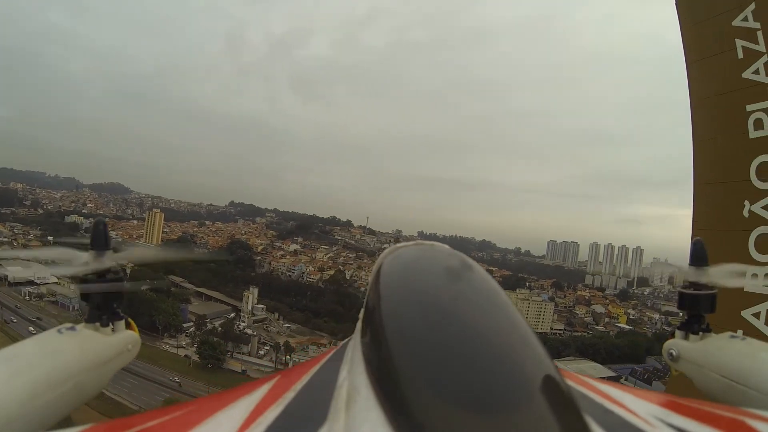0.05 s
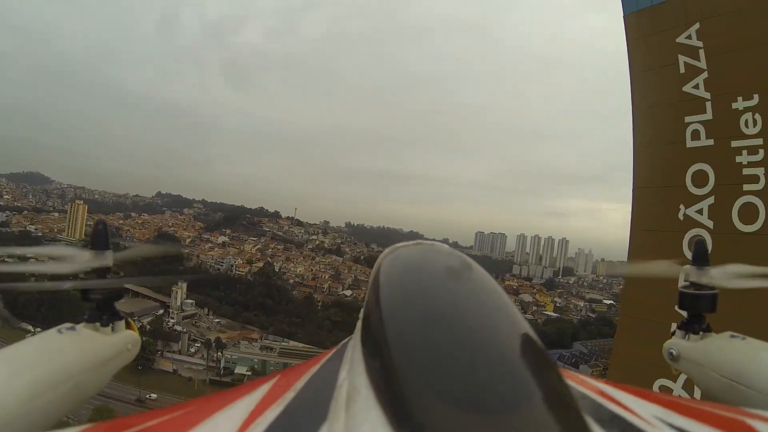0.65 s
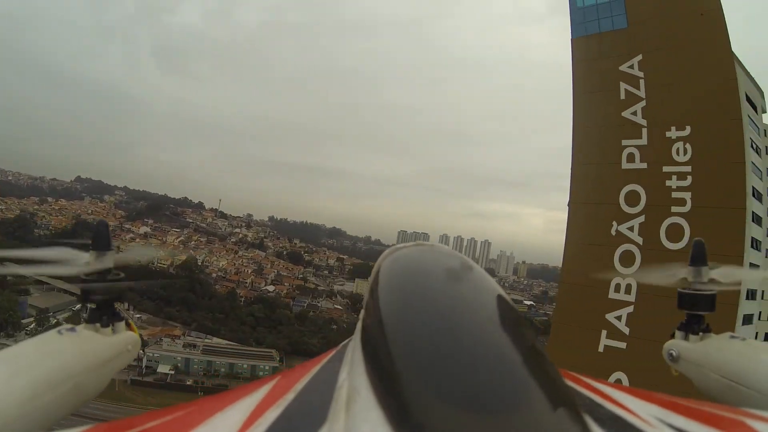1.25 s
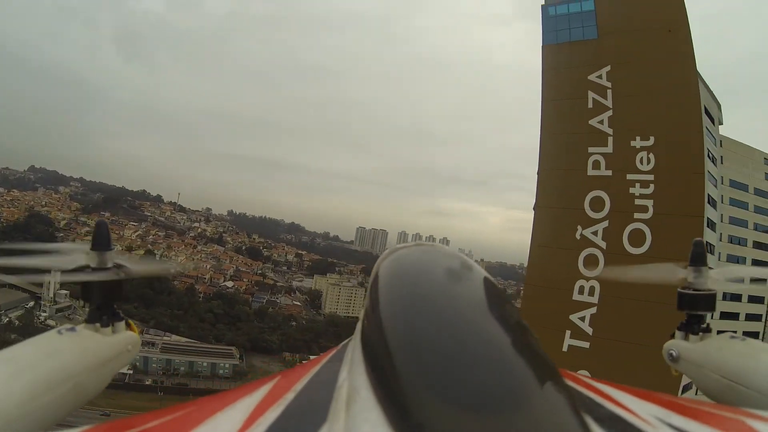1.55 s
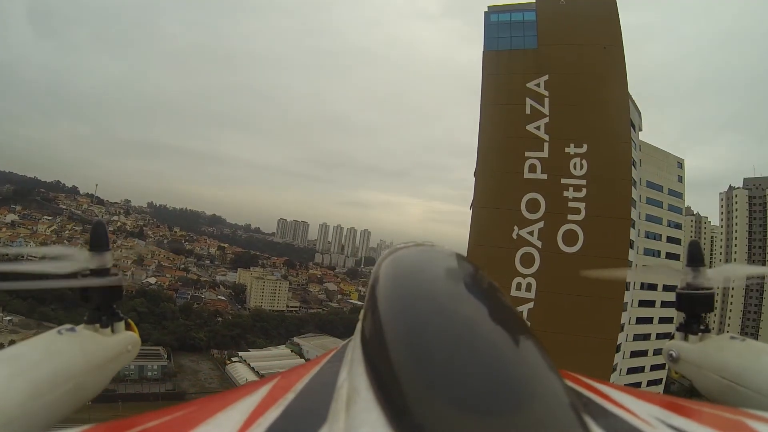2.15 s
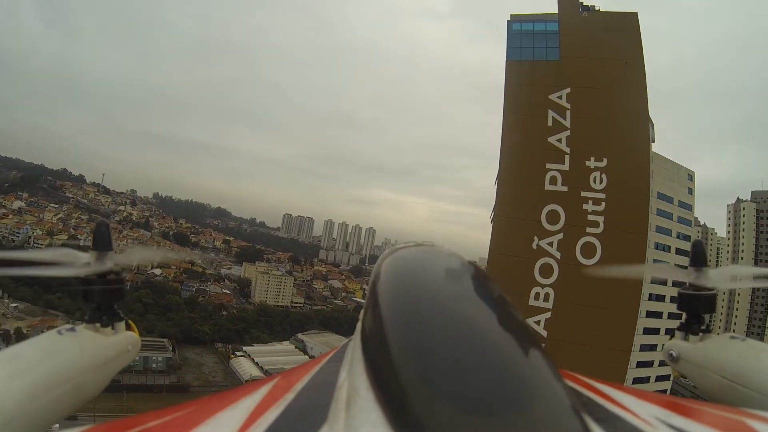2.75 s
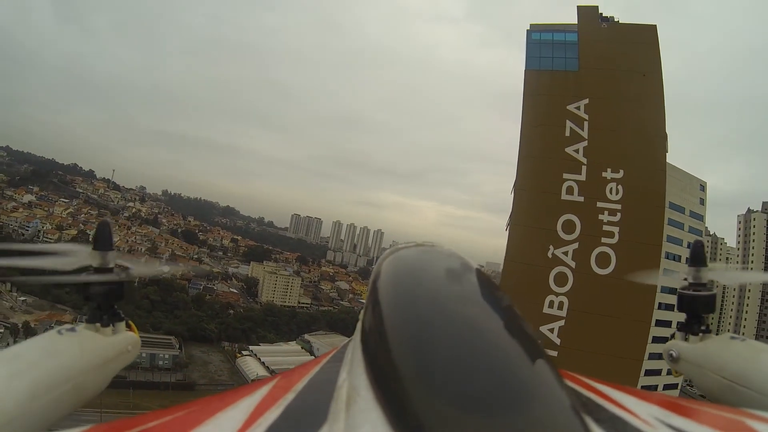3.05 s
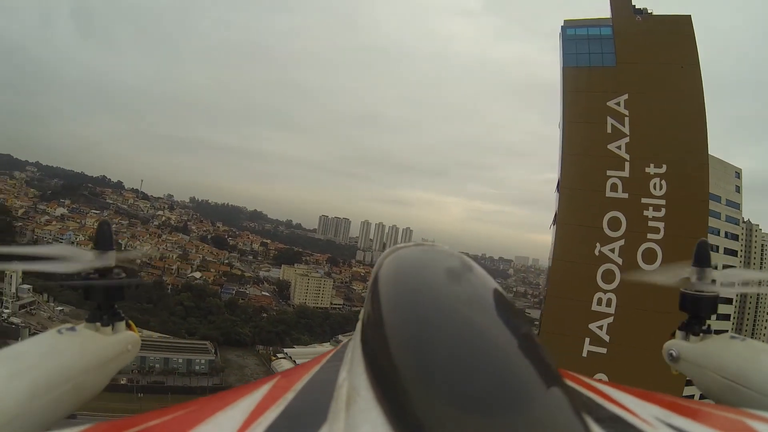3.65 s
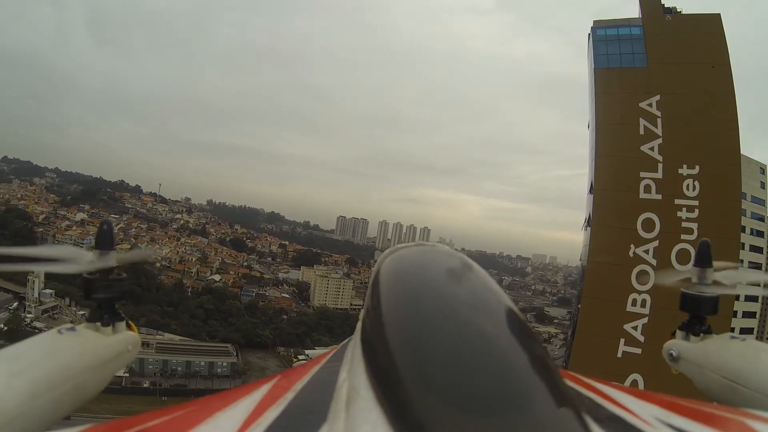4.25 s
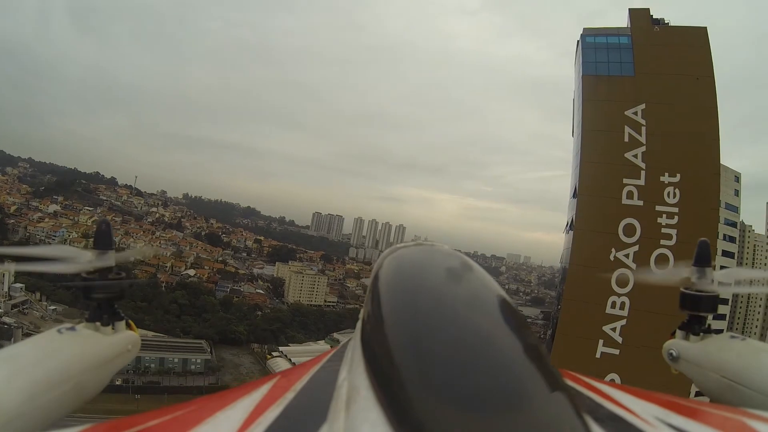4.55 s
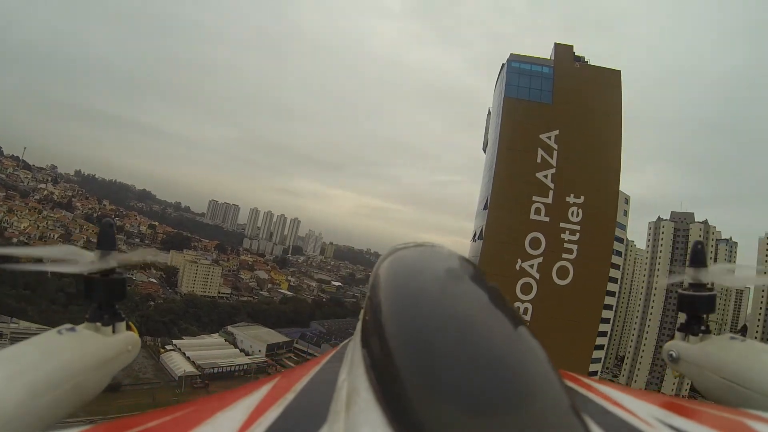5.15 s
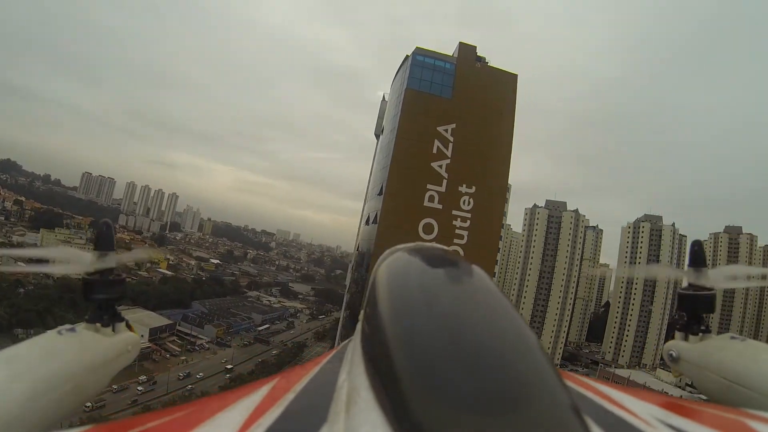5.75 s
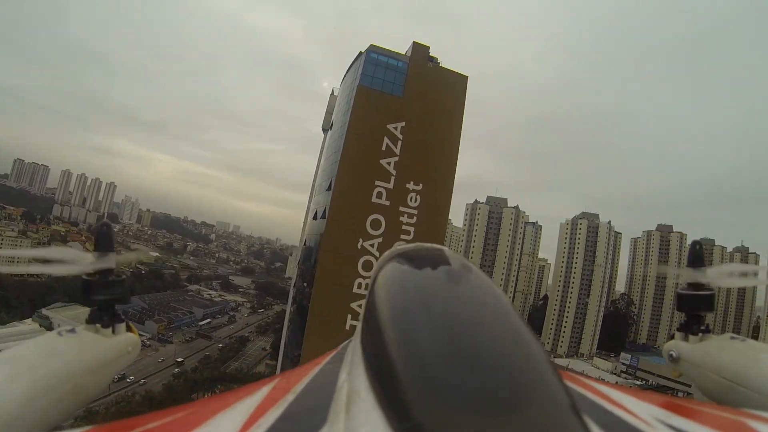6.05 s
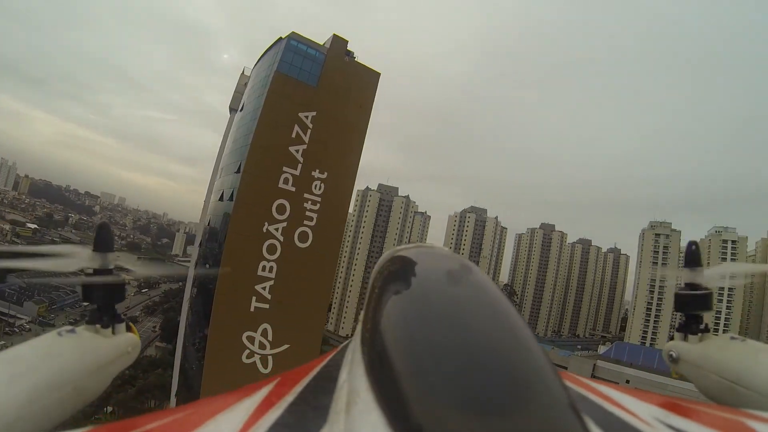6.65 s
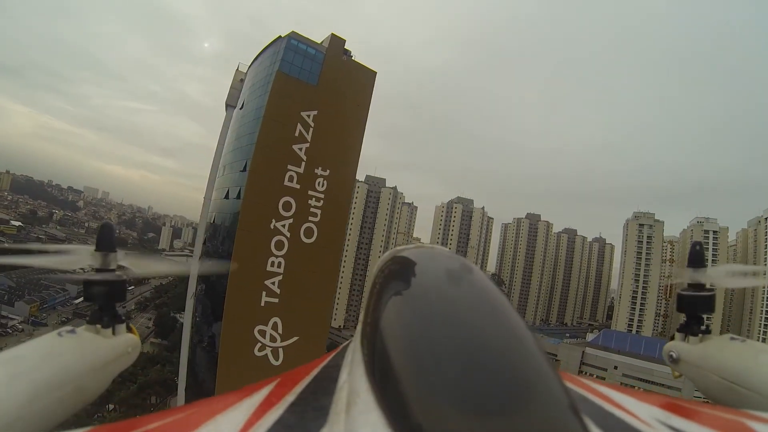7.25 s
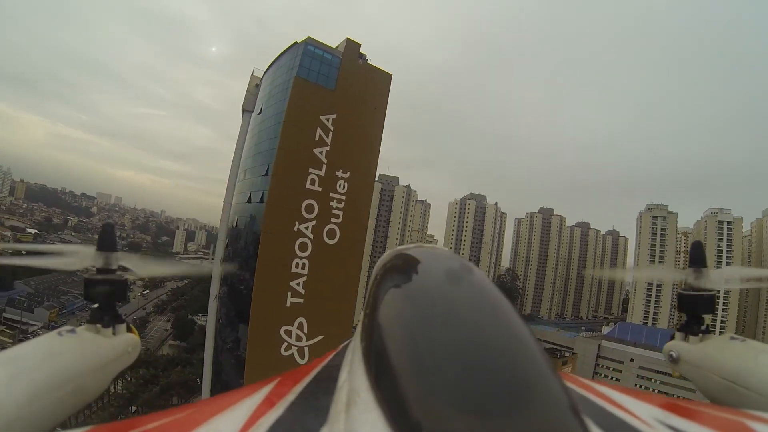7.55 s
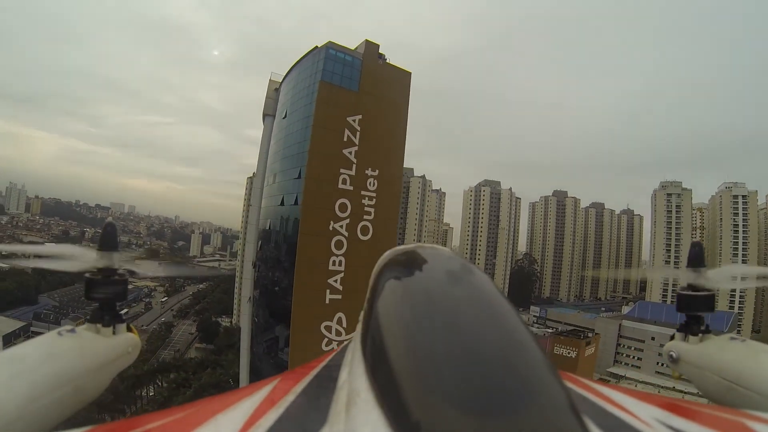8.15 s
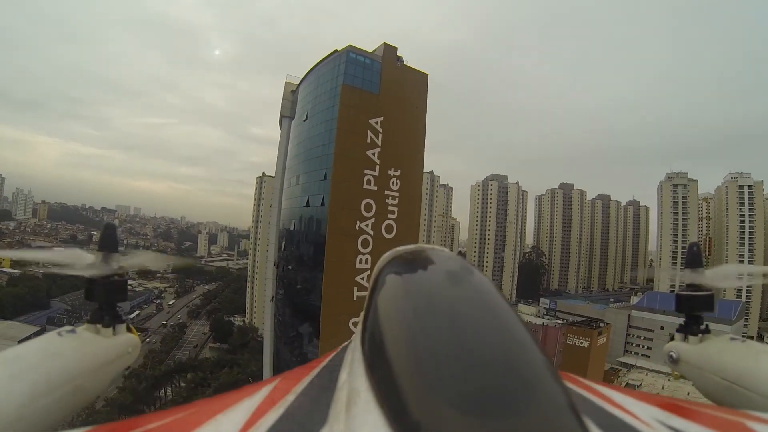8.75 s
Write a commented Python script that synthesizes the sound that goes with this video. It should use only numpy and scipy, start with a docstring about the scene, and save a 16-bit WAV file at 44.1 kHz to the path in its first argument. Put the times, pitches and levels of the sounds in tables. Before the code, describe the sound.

A small drone is in flight outdoors, heard very close from a microphone mounted on it. For the whole nine seconds or so, the nearest electric propeller holds a loud, steady, mid-pitched whine rich in overtones. Two quieter propellers waver just below it, creating a pulsing beat. Blade hiss, faint thin motor whistles and a low, lumpy wind rumble lie underneath. The whine brightens slightly around 1, 3 and 5 seconds. A fine, high buzz from the shaking mount grows stronger from about 4.5 seconds. At about 5.7 seconds a gust rushes over the microphone with low buffeting, ending in a swell of rumble near 7.7 seconds. The treble dips for an instant several times in the first three seconds and again near 7 seconds. The whine continues to the end.

```python
"""Three-propeller model aircraft in flight

Heard from a camera riding on it, the nearest propeller holds a loud, steady whine of blade-passage
harmonics; the two wing propellers hunt just below it and beat against it. Turbulence makes the blades
hiss, the motors whistle thinly, and the shaking makes the camera mount buzz. Wind rumbles on the
microphone, a gust rushes over it, and now and then the treble drops out for an instant."""
import sys
import numpy as np
from scipy import signal
from scipy.fft import rfft, irfft, next_fast_len
from scipy.io import wavfile

SR = 44100
rng = np.random.default_rng(int(sys.argv[2]) if len(sys.argv) > 2 else 0)


def file_out(sig):
    """Save sig as 16-bit WAV at sys.argv[1]."""
    # one column per channel
    cols = np.atleast_2d(sig).T
    # limit, then scale
    lim = np.clip(cols, -1, 1)
    pcm = np.round(lim * 32767).astype(np.int16)
    wavfile.write(sys.argv[1], SR, pcm)


N = 392490
TIME = np.arange(N) / SR

# nearest propeller: (time [s], shaft speed [Hz], blade tone level [dB])
NEAR_PROPELLER = [(0, 258, -14), (.7, 255.9, -13.5), (1.2, 257.7, -13.5), (1.8, 257.1, -13),
                  (4.4, 256.8, -12.5), (5, 257.2, -13), (5.85, 257.2, -13), (6.1, 257, -12),
                  (6.7, 256.8, -12.5), (7.1, 256.6, -11), (7.4, 257.1, -14.5), (8.3, 256.8, -13),
                  (8.9, 256.5, -12.5)]
# gust: (time [s], relative buffeting level [dB], relative rush level [dB])
GUST_LEVELS = [(5.74, -34, -41), (5.9, -31, -26.5), (6.1, -40, -33.5), (6.6, -41, -32), (7, -41.5, -33),
               (7.45, -34, -30.5), (7.62, -33.5, -33), (7.7, -43, -45)]


def gain_of(db):
    """Amplitude grows tenfold for every 20 dB."""
    return np.exp(np.asarray(db) * (np.log(10) / 20))


def unit_rms(x):
    """Normalisation to a mean power of 1."""
    return x / np.sqrt(np.mean(x ** 2) + 1e-20)


def curves(rows):
    """Linear interpolation of each column of a time table, at every sample."""
    times, *columns = np.transpose(rows)
    return [np.interp(TIME, times, column) for column in columns]


def spectral_gain(spectrum, hz):
    """Gain of a spectral envelope, interpolated in decibels over log frequency."""
    knots_hz, db = np.transpose(spectrum)
    return gain_of(np.interp(np.log(hz + 1), np.log(knots_hz + 1), db))


def noise(spectrum):
    """Spectral shaping turns white noise into coloured noise of rms 1."""
    size = next_fast_len(N)
    white = rfft(rng.standard_normal(size))
    return unit_rms(irfft(white * spectral_gain(spectrum, np.fft.rfftfreq(size, 1 / SR)), size)[:N])


def wander(rate_hz, size=8192):
    """Low-pass noise of rms 1: a random fluctuation up to about the given rate."""
    hz = np.fft.rfftfreq(size, TIME[-1] / size)
    slow = irfft(rfft(rng.standard_normal(size)) / (1 + (hz / rate_hz) ** 2))
    return unit_rms(np.interp(TIME, np.linspace(0, TIME[-1], size), slow))


def partial(turns, order, lag=0.):
    """A sinusoid of rms 1 at a multiple of the shaft speed; the phase lag is in its own cycles."""
    cycles = order * turns - lag
    return np.sqrt(2) * np.cos(2 * np.pi * (cycles - np.floor(cycles)).astype(np.float32))


def blade_gate(turns, width):
    """A Gaussian pulse at each blade passage; width is a share of the time between blades."""
    return np.exp(-.5 * (((2 * turns + .5) % 1 - .5) / width) ** 2)


def near_propeller(turns, level_db, slap_order=8, drift_db=.14, flutter=.037, dispersion=.00476):
    """Periodic pressure pulses form harmonics; uneven air modulates the higher ones most."""
    # harmonics, the even ones strong from two blades: (shaft order, level against the blade tone [dB])
    harmonics = [(1, -15.5), (2, 0.5), (3, -30.5), (4, -12), (5, -32.5), (6, -20), (8, -31), (9, -35.5),
                 (10, -29), (12, -32), (14, -37), (16, -39.5), (18, -46), (20, -37.5), (22, -45.5),
                 (24, -63), (26, -52)]
    # sharpness of the blade slap, from slap_order up: (time [s], lift [dB])
    slap = [(0, 4), (.95, 3), (1.25, -0.5), (4.5, -1.5), (5.2, 0.5), (6.7, -4), (7.5, -2.5), (8.7, 1)]
    # the harmonic at slap_order rings out: (time [s], lift [dB], half-width [s])
    flares = [(.95, 5.5, 0.19), (3.0, 4.5, 0.44), (5.03, 6, 0.26)]
    slap_db = curves(slap)[0]
    flare_db = sum(db * np.exp(-((TIME - s) / width) ** 2) for s, db, width in flares)
    blunt_db = -gust_window()  # the gust takes 1 dB off the octave of the blade tone
    out = np.zeros(N)
    for order, db in harmonics:
        order = round(order)
        lift_db = slap_db * (order >= slap_order) + flare_db * (order == slap_order)
        lift_db += blunt_db * (order == 4)
        unsteady = np.clip(order - 2, .5, 12.4)
        swell = gain_of(level_db + db + lift_db + drift_db * unsteady * wander(2.6))
        lag = dispersion * order ** 2  # higher partials arrive later through the airframe
        out += swell * (1 + flutter * unsteady * wander(41)) * partial(turns, order, lag)
    return out


def slot_whine(turns, level_db, waver=.45):
    """Magnets passing the motor slots excite thin whistles at multiples of the shaft speed."""
    # slot harmonics: (shaft order, relative level [dB])
    whistles = [(18, -58.5), (36, -54.5)]
    return sum(gain_of(level_db + db) * (1 + waver * wander(30)) * partial(turns, round(order))
               for order, db in whistles)


def mount_buzz(turns, lead_turns=.0943, jitter_turns=.0035, scrape=.41, dispersion=.0013):
    """Forced vibration: the mount ticks just ahead of each pressure peak, uneven in time and force."""
    # strength of the buzz: (time [s], relative level [dB])
    levels = [(0, -46), (1.26, -42), (1.44, -37.5), (2.67, -37.5), (4.35, -40), (4.65, -34), (5.2, -35.5),
              (5.95, -31.5), (6.3, -31.5), (6.44, -34), (6.56, -31), (7, -30.5), (7.15, -34.5), (7.6, -36),
              (8, -31.5), (8.5, -35), (8.9, -34.5)]
    # spectrum of one tick: (frequency [Hz], level [dB])
    tick = [(2000, -16), (4000, -0.5), (5500, -0.5), (7500, 0.5), (9500, 4), (11500, 4), (13000, 2),
            (15000, -13)]
    contact = turns + lead_turns + jitter_turns * wander(70)
    shaft_hz = np.mean(np.asarray(NEAR_PROPELLER)[:, 1])
    orders = np.arange(8, 60, 2)
    lags = dispersion * (orders - orders.mean()) ** 2  # the plastic spreads each tick into a chirp
    ticks = sum(spectral_gain(tick, order * shaft_hz) * partial(contact, order, lag)
                for order, lag in zip(orders, lags))
    grit = noise(tick) * blade_gate(contact, width=.11)
    uneven_db = 2 * wander(130) + 1.16 * wander(8)
    buzz = (unit_rms(ticks) + scrape * unit_rms(grit)) * gain_of(uneven_db)
    return gain_of(curves(levels)[0] - .46) * unit_rms(buzz)


def wing_propeller(turns, level_db, unbalance_db, eddy_db=-5., sway_db=.74):
    """Blade loading radiates harmonics; chopped eddies add a narrow noise band at each overtone."""
    # harmonics: (shaft order, level against the blade tone [dB])
    harmonics = [(2, 1), (3, -23.5), (4, -13), (6, -22)]
    # eddy bands: (shaft order, relative level [dB])
    bands = [(4, -44), (6, -50.5), (8, -47), (10, -46), (12, -52), (14, -47), (16, -50)]
    shake = gain_of(unbalance_db) * partial(turns, 1)  # unbalance hums once a turn, whatever the load
    tones = sum(gain_of(level_db + db) * partial(turns, round(order)) for order, db in harmonics)
    eddies = sum(gain_of(db) * wander(91) * partial(turns, round(order)) for order, db in bands)
    return shake + tones * gain_of(sway_db * wander(5.8)) + gain_of(eddy_db) * eddies


def bearing(turns, level_db=-43.):
    """The rolling balls of a motor bearing sing an inharmonic tone between the shaft orders."""
    return gain_of(level_db) * (1 + .3 * wander(40)) * partial(turns, order=2.69)


def blade_hiss(near, fast, slow, level_db=-33, width=.08, flicker_db=.8):
    """Turbulence radiates broadband noise, amplitude-modulated by every passing blade."""
    # hiss: (frequency [Hz], spectral density [dB])
    spectrum = [(200, -4), (380, -7), (600, -2.5), (850, -4.5), (1250, -1), (1750, -9), (2400, -5),
                (3400, -9), (4800, -11.5), (6200, -10.5), (9000, -12), (12500, -20), (15000, -21.5)]
    wing_pulses = blade_gate(fast, width) + blade_gate(slow, width)
    swell = 1 + .32 * blade_gate(near, width) + .29 * wing_pulses
    return gain_of(level_db + flicker_db * wander(25)) * unit_rms(swell) * noise(spectrum)


def wind_rumble(lumps):
    """Pressure fluctuations of the wind on the microphone make a low, lumpy rumble."""
    # strength of the rumble: (time [s], level [dB])
    levels = [(0, -42), (.1, -33), (.7, -50), (1.05, -33), (1.3, -44.5), (3.4, -36.5), (4.7, -39),
              (5.1, -34.5), (5.85, -32.5), (6.3, -39), (7.1, -42), (7.62, -26), (7.75, -34), (8.9, -39)]
    # rumble: (frequency [Hz], spectral density [dB])
    spectrum = [(12, -13), (30, -2), (55, 1.5), (100, -2), (170, -5.5), (260, -11), (450, -20), (1000, -60)]
    return gain_of(curves(levels)[0]) * noise(spectrum) * lumps


def gust_window(half_fade_s=.072):
    """A trapezoidal envelope: 1 while the gust lasts, 0 outside it."""
    start, end = GUST_LEVELS[0][0], GUST_LEVELS[-1][0]
    corners = [start - half_fade_s, start + half_fade_s, end - half_fade_s, end + half_fade_s]
    return np.interp(TIME, corners, [0, 1, 1, 0])


def gust(buffet_lumps, rush_lumps):
    """Flow noise of a gust over the microphone: low buffeting and a brighter rush."""
    # buffeting: (frequency [Hz], spectral density [dB])
    buffet_spectrum = [(40, -26), (90, 3), (170, 3), (280, 6), (420, 0), (650, -11), (1500, -45)]
    # rush: (frequency [Hz], spectral density [dB])
    rush_spectrum = [(300, -10), (550, 4), (800, -0.5), (1200, -9.5), (1800, -33), (4000, -45)]
    buffet_db, rush_db = curves(GUST_LEVELS)
    buffet = gain_of(buffet_db + 8) * noise(buffet_spectrum) * buffet_lumps
    rush = gain_of(rush_db + 1) * noise(rush_spectrum) * rush_lumps
    return gust_window() * (buffet + rush)


def shaft_turns(speed_hz, hunt_hz, rate_hz):
    """Phase in turns is the integral of a shaft speed that wanders by about hunt_hz."""
    return np.cumsum(speed_hz + hunt_hz * wander(rate_hz)) / SR


def scene():
    """Superposition: three shafts at nearby speeds make tones that beat, with wind on top."""
    # fast wing propeller, which steers: (time [s], shaft speed [Hz])
    fast_speed = [(0, 244), (.7, 248.5), (.9, 244), (1.55, 238.8), (1.8, 242), (2.2, 239), (2.64, 244),
                  (2.91, 237.6), (3.5, 251), (3.81, 244.5), (4.1, 251), (4.5, 253), (5, 240), (5.67, 242.5),
                  (6.55, 239), (7.95, 249), (8.3, 245.6), (8.9, 247.6)]
    # slow wing propeller, which only drifts: (time [s], shaft speed [Hz])
    slow_speed = [(0, 233), (1, 231.7), (1.65, 236), (2.5, 232.5), (3.7, 230), (6.7, 231), (7.4, 229.5),
                  (8.9, 231.8)]
    # shared blade loading: (time [s], blade tone level of the fast one [dB])
    wing_load = [(0, -31), (1.5, -28), (5.1, -28), (7, -25), (7.4, -27.5), (8.9, -27)]
    near_hz, near_db = curves(NEAR_PROPELLER)
    load_db = curves(wing_load)[0]
    near = shaft_turns(near_hz, hunt_hz=.12, rate_hz=12)
    fast = shaft_turns(curves(fast_speed)[0], hunt_hz=.6, rate_hz=5)
    slow = shaft_turns(curves(slow_speed)[0], hunt_hz=.6, rate_hz=5)
    close = near_propeller(near, near_db) + slot_whine(near, level_db=1.5) + mount_buzz(near)
    wings = wing_propeller(fast, load_db, unbalance_db=-33.)
    wings += bearing(fast) + slot_whine(fast, level_db=-1.)
    wings += wing_propeller(slow, load_db - 2, unbalance_db=-40.5)
    hiss = blade_hiss(near, fast, slow)
    surge = wander(23)  # one fluctuation moves all the wind noise, the rush least
    low_lumps = unit_rms(gain_of(3.5 * surge))
    rush_lumps = unit_rms(gain_of(1.9 * surge))
    wind = wind_rumble(low_lumps) + gust(low_lumps, rush_lumps)
    return (close + wings + hiss + wind)[None]


def record(dry, half_gap_s=.0095, depth=.9, edge_hz=15300):
    """Filtering: the treble drops out for an instant now and then, and a low-pass limits the band."""
    # treble dropouts: (time [s], cutoff [Hz])
    dropouts = [(.284, 4000), (.666, 3750), (.818, 3820), (.988, 3400), (1.222, 2430), (1.5, 2810),
                (2.182, 1900), (2.78, 2300), (7.069, 1900)]
    out = dry[0]
    for s, hz in dropouts:
        treble = signal.sosfiltfilt(signal.butter(4, hz, "high", fs=SR, output="sos"), out)
        gap = np.exp(-abs((TIME - s) / half_gap_s) ** 3)
        out = out - depth * gap * treble
    low_pass = signal.firwin(1023, edge_hz, window=("kaiser", 9), fs=SR)
    return signal.oaconvolve(out, low_pass, "same")[None]


dry = scene()
out = record(dry)
file_out(out)
```